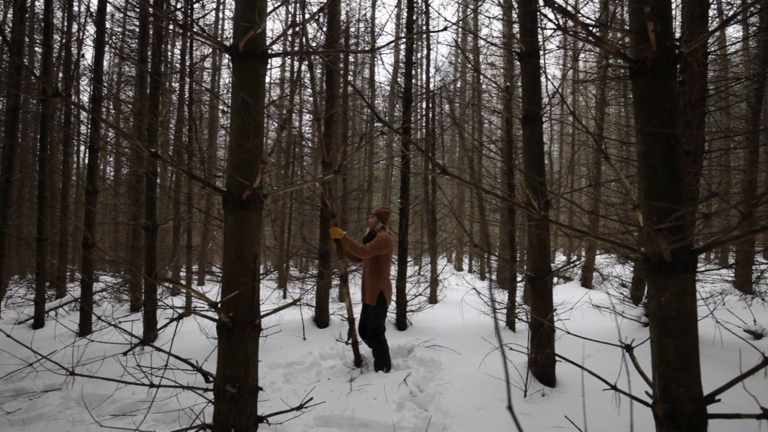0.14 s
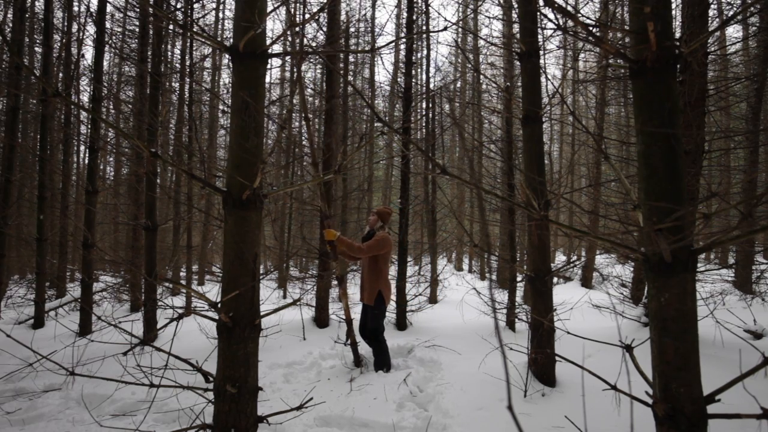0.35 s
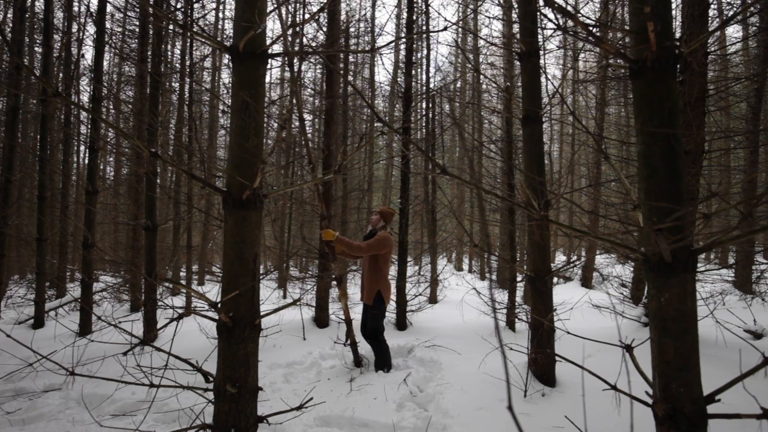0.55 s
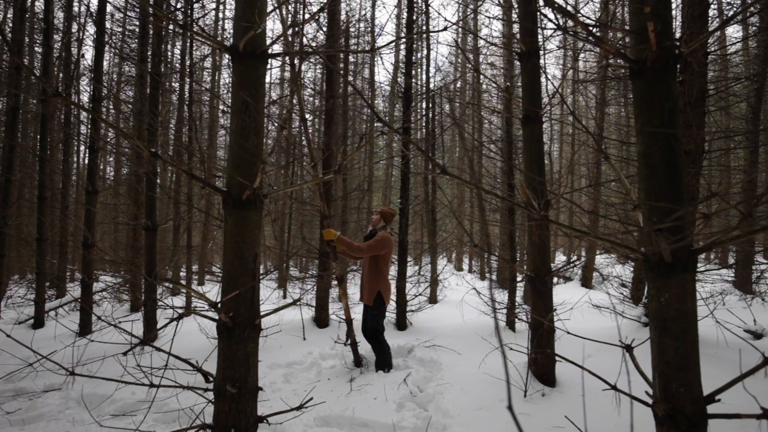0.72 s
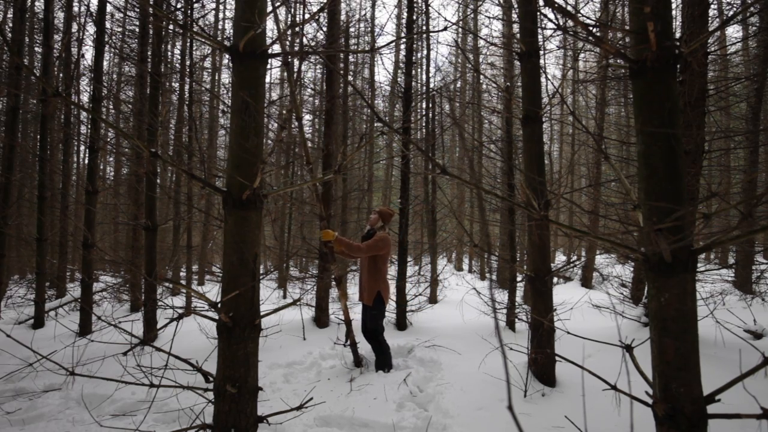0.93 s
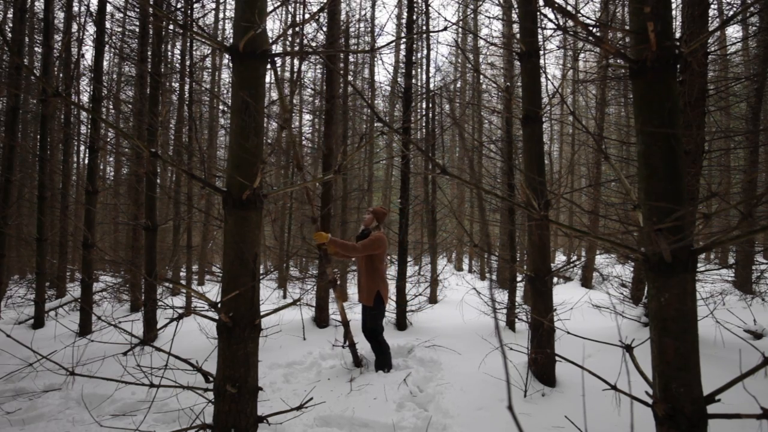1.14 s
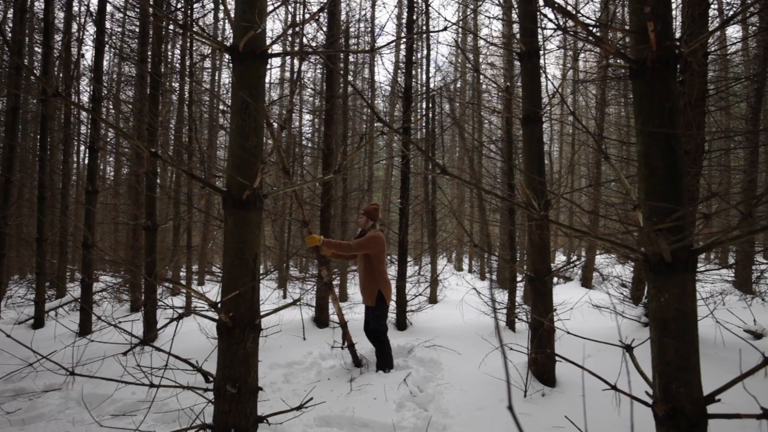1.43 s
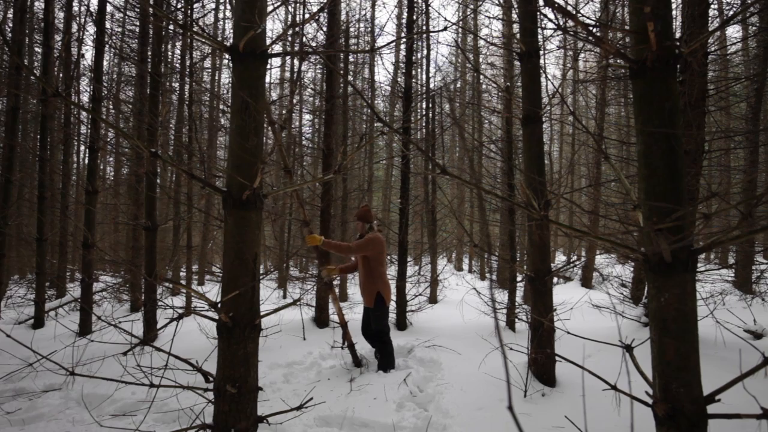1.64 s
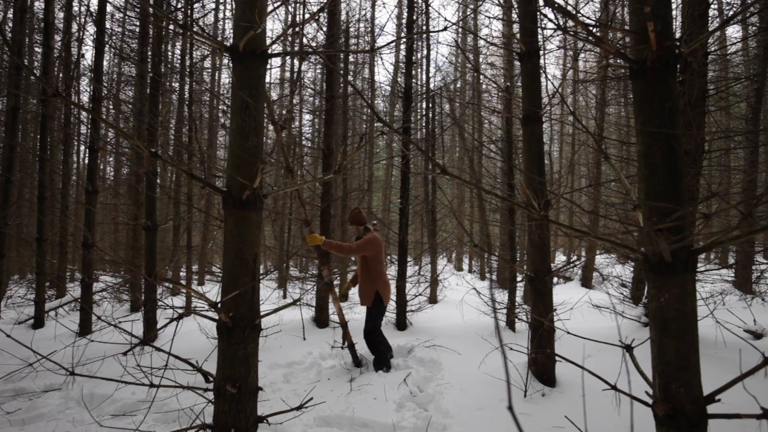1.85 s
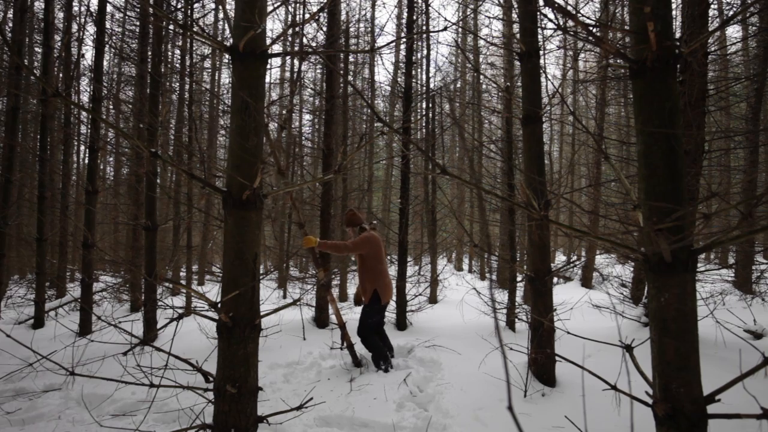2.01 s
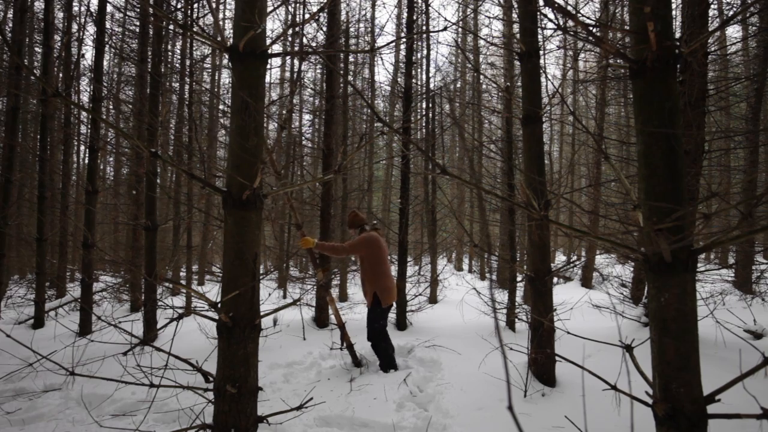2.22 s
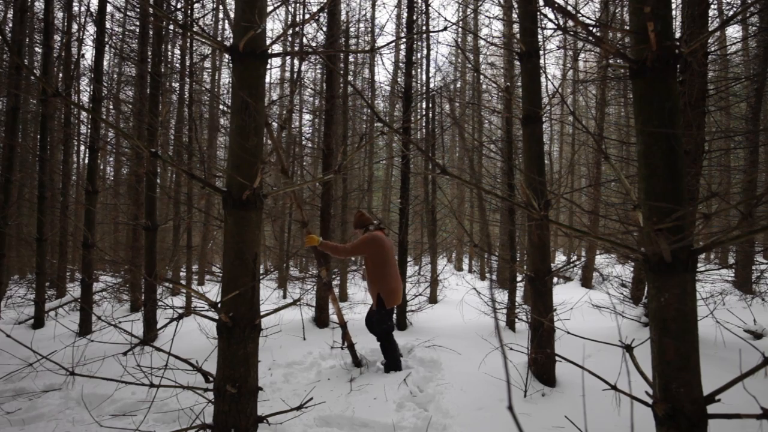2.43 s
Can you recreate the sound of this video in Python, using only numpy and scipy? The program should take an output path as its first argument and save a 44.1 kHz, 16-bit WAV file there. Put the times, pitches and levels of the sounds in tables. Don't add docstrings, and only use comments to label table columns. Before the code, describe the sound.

Dry wood cracking, loudest just after half a second, then again near the middle and towards the end, over rough twig scraping, soft low footfalls in snow and a quiet forest hush, heard from a few metres.

```python
import sys
import numpy as np
from scipy import signal
from scipy.io import wavfile
from scipy.ndimage import uniform_filter1d

SR = 44100
rng = np.random.default_rng(int(sys.argv[2]) if len(sys.argv) > 2 else 0)


def generate_wav(signal):
    frames = np.transpose(np.atleast_2d(signal))
    scaled = np.clip(frames, -1, 1) * 32767
    pcm = np.round(scaled).astype(np.int16)
    wavfile.write(sys.argv[1], SR, pcm)


def how_loud(loudness_db):
    steps = np.asarray(loudness_db, float) / 20
    return 10 ** steps


N = 112455
LAG_S = .0008


def evened(x):
    return x / np.sqrt(np.mean(x ** 2) + 1e-20)


def add(mix, s, sound):
    part = mix[max(round(s * SR), 0):][:len(sound)]
    part += sound[:len(part)]


def coloured(x, points):
    hz, db = np.transpose(points)
    bins_hz = np.fft.rfftfreq(2048, 1 / SR)
    half = np.interp(np.log(bins_hz + 1), np.log(hz + 1), db) * np.log(10) / 20
    log_gain = np.concatenate([half, half[-2:0:-1]])
    response = np.fft.ifft(np.exp(np.conj(signal.hilbert(log_gain)))).real
    return signal.oaconvolve(x, response)[:len(x)]


def resonate(x, hz, width):
    turn = np.exp(2j * np.pi * hz * np.arange(len(x)) / SR)
    r = np.exp(-np.pi * width / SR)
    return 2 * (turn * signal.lfilter([1 - r], [1, -r], x / turn)).real


def band_pass(x, order, low_hz, high_hz):
    return signal.sosfilt(signal.butter(order, [low_hz, high_hz], "band", fs=SR, output="sos"), x)


def drift(smooth_s):
    size = max(int(smooth_s * SR), 1)
    once = uniform_filter1d(rng.standard_normal(N), size)
    return evened(uniform_filter1d(once, size))


# (frequency [Hz], density [dB per Hz])
AIR = [(71, -39), (120, -2.5), (563, -5.5), (1180, -6), (1580, -22.5), (2280, -13), (6800, -2.5),
       (13700, -44), (16500, -65)]
# (time [s], level [dB])
WIND = [(0, -60), (.18, -59), (.4, -56.5), (.62, -52), (.75, -71.5), (1.1, -65), (1.3, -60.5), (1.75, -56),
        (2.1, -54.5), (2.28, -72.5), (2.45, -59), (2.55, -65)]
AIR_DB, WIND_HZ, WIND_LUMP_DB = -50, 137, 3.5


def air():
    rumble = band_pass(rng.standard_normal(N), 2, 28, WIND_HZ)
    level_db = np.interp(np.arange(N) / SR, *np.transpose(WIND))
    lumps_db = WIND_LUMP_DB * drift(0.0064)
    hush = evened(coloured(rng.standard_normal(N), AIR))
    return how_loud(AIR_DB + 0.37 * (level_db + 62)) * hush + how_loud(level_db + lumps_db) * evened(rumble)


def grains(per_s, spread_db):
    size = how_loud(spread_db * np.minimum(rng.exponential(1, N), 5)) * (rng.random(N) < per_s / SR)
    kind, clicks, t = rng.integers(0, 16, N), np.zeros(N), np.arange(256) / SR
    for k, hz in enumerate(np.geomspace(900, 13000, 16)):
        puff = rng.standard_normal(len(t)) * np.exp(-t / 0.00067)
        shape = evened(puff) + 0.59 * evened(resonate(puff, hz, 300 + hz / 7.5))
        clicks += signal.oaconvolve(size * (kind == k), shape)[:N]
    return evened(clicks)


# (frequency [Hz], density [dB per Hz])
TWIG = [(180, -26), (300, -13.5), (649, -12), (834, -12.5), (2480, -4.5), (7380, 0), (14400, -32),
        (15700, -67), (16500, -84)]
# (time [s], scrape level [dB], woody rub [dB], fine bright ticks [dB])
SCRAPE = [(0, -41, -1.5, -12), (.22, -32.5, -17, 1), (.45, -31, -24, 6), (.6, -35, -22, -17),
          (.66, -37.5, -16, -15), (.76, -43.5, 0, -5), (.91, -45.5, 1, -5), (.95, -38, -2.5, 13),
          (1.15, -36.5, -0.5, -9), (1.28, -30.5, -26, 5.5), (1.4, -31, -4.5, 3), (1.62, -33, 0.5, -10),
          (1.68, -48, 3.5, 4), (2.1, -41.5, -2.5, -2), (2.28, -42.5, -15, 13), (2.39, -50.5, -7, -2),
          (2.45, -41, -3, -12), (2.55, -50.5, 4, 10)]
# (time [s], swell [dB], half length [s])
BRUSHES = [(.008, 5.5, 0.0072), (0.158, 4, 0.0038), (0.48, 0, 0.011), (0.752, -1, 0.0031),
           (0.79, 4, 0.0074), (0.895, 4, .003), (1.106, 8, 0.0052), (1.187, 5, 0.017), (1.221, 5.5, 0.0084),
           (1.286, 1, 0.03), (1.596, 2.5, 0.016), (1.75, 9.5, 0.0055), (1.813, 8.5, .006),
           (1.944, 7, 0.019), (2.043, 4.5, 0.0033), (2.127, 6.5, 0.017)]
GRAINS_PER_S, GRAIN_SPREAD_DB, FIZZ_SHARE = 3500, 3.8, 0.5
RUB_HZ, RUB_WIDTH_HZ = 1945, 1050
FINE_PER_S, FINE_SPREAD_DB, FINE_HZ = 1700, 2.4, 7000
FLICKER_DB, FLICKER_S = 1.2, .008


def scrape():
    clicks = grains(GRAINS_PER_S, GRAIN_SPREAD_DB)
    brush = (1 - FIZZ_SHARE) * clicks + FIZZ_SHARE * rng.standard_normal(N)
    rub = resonate(resonate(grains(1500, 0.5), RUB_HZ, RUB_WIDTH_HZ), RUB_HZ, RUB_WIDTH_HZ)
    fine = band_pass(grains(FINE_PER_S, FINE_SPREAD_DB), 1, FINE_HZ, 14000)
    t = np.arange(N) / SR
    s, *columns = np.transpose(SCRAPE)
    level_db, rub_db, fine_db = (np.interp(t, s, c) for c in columns)
    level_db = level_db + sum(db * np.exp(-((t - at) / half) ** 2) for at, db, half in BRUSHES)
    layers = evened(coloured(brush, TWIG))
    layers = layers + how_loud(rub_db - 8.5) * evened(rub) + how_loud(fine_db - 21.0) * evened(fine)
    return layers * how_loud(level_db + FLICKER_DB * drift(FLICKER_S))


PITCH_SHARE, PITCH_Q = .55, 1.8
THIN = .75
SPLINTER_DECAY_S, TAIL_S = 0.00056, 0.01


def crack(db, hz, length_ms, tail_db, share=PITCH_SHARE):
    t = np.arange(2048) / SR
    noise, patter, pick = rng.standard_normal((3, 2048))
    fade = np.exp(-np.maximum(t - length_ms / 1000, 0) / SPLINTER_DECAY_S)
    fibres = np.sign(noise) * (2.8 + .4 * abs(pick)) * fade
    fibres = np.where(t == 0, 3.0, fibres)
    burst = signal.lfilter([1, -THIN], 1, coloured(fibres, TWIG))
    pitched = resonate(resonate(burst, hz, hz / PITCH_Q), hz, hz / PITCH_Q)
    core = (1 - share) * evened(burst) + share * evened(pitched)
    tail = evened(coloured(patter * how_loud(3.5 * pick), TWIG))
    tail = tail * np.exp(-t / TAIL_S) * np.minimum(t / 0.0029, 1)
    return how_loud(db) * (core / abs(core).max() + how_loud(tail_db) * 0.43 * tail)


# (time [s], peak [dB], pitch [Hz], break length [ms], splinter tail [dB])
SNAPS = [(0.0305, -24, 5600, 2.2, -3), (.2862, -10, 6760, 0.64, -8), (0.3851, -15.5, 5970, 1.5, 1.5),
         (0.3927, -12.5, 9600, 0.91, -4), (0.3992, -15, 5950, 0.93, -1.5), (.5895, -1, 5000, .15, -14),
         (.5912, -8, 3800, .4, -14), (.6268, 2, 6900, 1.2, -14), (.6274, -5, 3000, .6, -20),
         (.629, -5, 3600, 1.5, -15), (1.2897, 1, 6000, .3, -11), (2.15, 0, 6100, .7, -22),
         (2.1502, -11, 3900, .3, -25), (0.6372, -13, 6400, 0.4, -3), (0.925, -19.5, 6100, 2.4, -3),
         (0.9302, -14.5, 5700, 1.5, -9), (1.259, -7.5, 5730, 1.2, -23), (1.2974, -10, 6950, .6, -5),
         (1.3034, -8.5, 4530, 0.92, -16), (1.3102, -9, 5870, 2.1, -2.5), (1.6277, -3, 6400, 0.3, -15),
         (1.6322, -6, 5200, .3, -22), (1.6494, -12.5, 6470, .4, -23), (2.1809, -17.5, 6260, 0.43, -7),
         (2.2443, -10, 8600, .1, -28), (2.2546, -15, 5500, .2, -24), (2.2633, -10, 6300, 0.15, -22)]
# (time [s], peak [dB], pitch [Hz])
TICKS = [(0.125, -18, 6900), (0.236, -22, 5500), (0.2479, -13.5, 6450), (0.572, -20, 6600),
         (1.064, -15.5, 7850), (1.101, -18, 5430), (1.178, -24, 5600), (1.218, -22, 7000),
         (1.253, -14, 6100), (1.355, -11.5, 6340), (1.3994, -15, 7200), (1.5123, -8, 7000),
         (1.605, -16, 5400), (1.6876, -22, 6550), (1.719, -19.5, 4000), (1.7282, -18, 7500),
         (1.7648, -19.5, 5440), (1.7915, -24.5, 7000), (1.875, -25, 7150), (1.9718, -17, 4420),
         (2.0168, -28, 6500), (2.0662, -26, 5900), (2.0963, -31, 5740), (2.204, -27, 6500),
         (2.228, -23, 5000), (2.4433, -18.5, 5760), (2.464, -30, 6550), (0.5812, -17, 9300),
         (0.6533, -11, 3760), (0.9244, -22, 4950), (.969, -29, 7000), (.979, -33, 9900),
         (1.036, -14.5, 8400), (1.057, -19, 7000), (1.184, -18, 3500), (1.197, -17, 3970),
         (1.262, -29, 4600), (1.2962, -22, 3020), (1.558, -30, 8200), (1.98, -34, 4400),
         (2.1658, -15, 6000), (2.198, -21, 4000), (2.221, -26, 7500)]
TICK_DB, TICK_SHARE = -2, .9


def twigs():
    out = np.zeros(N)
    for s, *row in SNAPS:
        add(out, s + LAG_S, crack(*row))
    for s, db, hz in TICKS:
        add(out, s + LAG_S, crack(db + TICK_DB, hz, 0.25, -19, TICK_SHARE))
    return out


# (time [s], peak [dB], pitch [Hz], ring T60 [s])
KNOCKS = [(.6252, -17, 2700, .004), (.6288, -11, 1300, .006), (.6272, -16, 2400, .004),
          (2.154, -28, 2000, .034), (.8426, -27, 2000, .0035), (.876, -27, 2150, .0035),
          (1.634, -34, 1600, .06), (2.2545, -20, 2800, .003), (.0365, -39, 900, .02),
          (.0305, -30, 1950, .005), (.033, -34, 1250, .007), (.8475, -35, 1400, .005),
          (.8785, -34, 1400, .005), (2.1505, -31, 2050, .012), (2.168, -38, 1900, .03),
          (1.555, -33, 1950, .02), (1.628, -24, 2100, .006), (.6282, -17, 880, .008),
          (1.815, -37, 1950, .015), (.614, -33, 2000, .006), (2.15, -30, 700, .006),
          (1.0994, -29, 2100, .006), (1.792, -36, 1900, .008), (1.812, -40, 830, .03),
          (2.263, -18, 2600, .003), (2.26, -35, 700, .006), (1.943, -38, 1600, .01),
          (2.467, -36, 1900, .01)]
SAG = .25


def knocks():
    out, t = np.zeros(N), np.arange(4096) / SR
    for s, db, hz, t60 in KNOCKS:
        turns = hz * (t - SAG * t60 * (t / t60 - 1 + np.exp(-t / t60)))
        neighbour = np.sin(2 * np.pi * (1.05 * turns + rng.random()))
        pair = np.sin(2 * np.pi * turns) + .45 * neighbour
        ring = pair * (1 - np.exp(-t / (.15 * t60))) * how_loud(-60 * t / t60)
        add(out, s + LAG_S, how_loud(db) * ring / abs(ring).max())
    return out


# (time [s], peak [dB])
SPARKS = [(0.0318, -39), (0.1047, -40), (0.1241, -42), (0.1516, -42), (0.2862, -33), (0.3464, -40),
          (0.3745, -35), (0.3854, -29), (0.392, -21), (0.5731, -31), (0.6265, -21), (0.7402, -48),
          (0.8375, -44), (0.8664, -49), (0.9248, -29), (0.9314, -33), (0.9787, -38), (0.9854, -42),
          (1.0635, -41), (1.1692, -35), (1.1894, -38), (1.2481, -40), (1.2605, -32), (1.2895, -22),
          (1.3764, -34), (1.3997, -33), (1.4731, -34), (1.5115, -37), (1.6274, -34), (1.6322, -30),
          (1.6876, -41), (1.7054, -48), (1.7305, -48), (1.7444, -44), (1.7923, -47), (1.8552, -46),
          (1.8756, -47), (1.9639, -48), (2.0173, -44), (2.0358, -41), (2.0602, -40), (2.1495, -16),
          (2.2443, -27), (2.2633, -36)]
SPARK_HZ, SPARK_S, SPARK_DB = 7500, .0004, 2


def sparks():
    out, t = np.zeros(N), np.arange(256) / SR
    for s, db in SPARKS:
        fibres = (1 + .5 * rng.standard_normal(256)) * rng.choice([-1, 1], 256)
        tick = band_pass(fibres * np.exp(-t / SPARK_S), 2, SPARK_HZ, 13000)
        add(out, s + LAG_S, how_loud(db + SPARK_DB) * tick / abs(tick).max())
    return out


NEAR_DB, NEAR_T60, FAR_DB, FAR_T60 = -6, 0.019, -14, 0.56


def trunks(x):
    t = np.arange(SR // 2) / SR
    taps = rng.choice([-1., 1.], (2, len(t))) * (rng.random((2, len(t))) < [[.06], [.1]]) * (t > .0015)
    near, far = taps[0] * how_loud(-60 * t / NEAR_T60), taps[1] * how_loud(-60 * t / FAR_T60)
    tail = how_loud(NEAR_DB) * near / np.linalg.norm(near) + how_loud(FAR_DB) * far / np.linalg.norm(far)
    softened = signal.lfilter([.6, .4], 1, x)
    return signal.fftconvolve(softened, tail)[:N]


# (time [s], peak [dB], pitch [Hz])
THUMPS = [(0.062, -29.5, 67), (0.286, -40, 71.6), (0.552, -37, 100), (0.607, -37, 49.7), (0.959, -43, 60),
          (1.189, -37, 91.5), (1.349, -31.5, 53), (1.398, -33, 89), (1.54, -32, 114), (1.761, -28.5, 87.5),
          (1.7925, -20, 68), (1.964, -43.5, 69), (2.437, -26, 74)]


def boots():
    out = np.zeros(N)
    for s, db, hz in THUMPS:
        u = np.arange(int(4 * SR / hz)) * hz / SR
        noise = rng.standard_normal(N // 20)[:len(u)]
        crunch = evened(resonate(noise, 1.85 * hz, 0.31 * hz))
        push = np.sin(2 * np.pi * u ** 0.53 * 1.66)
        add(out, s, how_loud(db) * 2.05 * u * np.exp(-1.7 * u) * (0.19 * crunch + push))
    return out


WOOD_LOW_HZ, HISS_EDGE_HZ = 560, 15750


def scene():
    high = signal.butter(4, WOOD_LOW_HZ, "high", fs=SR, output="sos")
    wood = signal.sosfilt(high, twigs() + knocks() + sparks())
    edge = signal.firwin(255, HISS_EDGE_HZ, window=("kaiser", 6), fs=SR)
    around = trunks(wood) + scrape() + boots() + air()
    return (wood + signal.oaconvolve(around, edge, "same"))[None]


def top_cut(x):
    return signal.sosfilt(signal.butter(12, 16970, fs=SR, output="sos"), x)


DUCK_AT_DB, DUCK_SHARE, RECOVER_DB_PER_S = -20.5, 0.3, 9
EDGE_HZ = 16800


def record(dry):
    power_db = 10 * np.log10(abs(uniform_filter1d(dry[0] ** 2, 300)) + 1e-12)
    fall = np.arange(N) * RECOVER_DB_PER_S / SR
    held_db = np.maximum.accumulate(power_db + fall) - fall
    over_db = np.maximum(held_db - DUCK_AT_DB, 0)
    late_db = signal.lfilter([.002], [1, -.998], over_db)
    clipped = np.clip(dry / how_loud(DUCK_SHARE * late_db), -.9, .9)
    edge = signal.firwin(255, EDGE_HZ, window=("kaiser", 8), fs=SR)[None]
    return top_cut(signal.oaconvolve(clipped, edge, "same"))


dry = scene()
out = record(dry)
generate_wav(out)
```